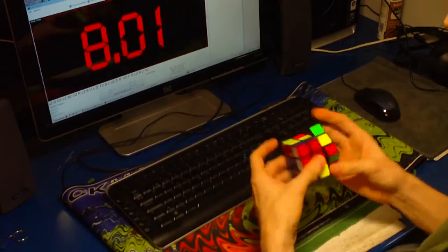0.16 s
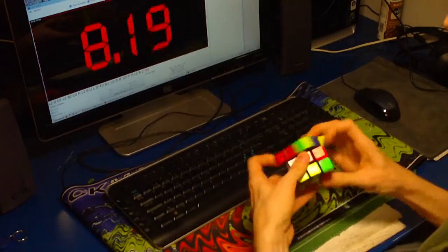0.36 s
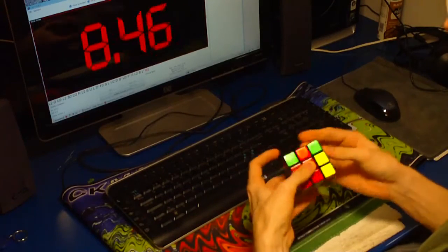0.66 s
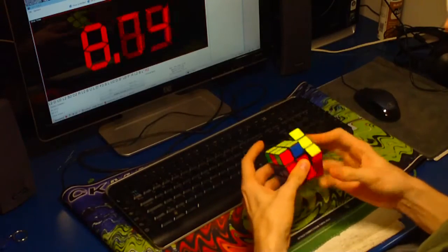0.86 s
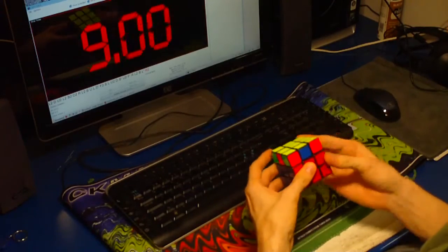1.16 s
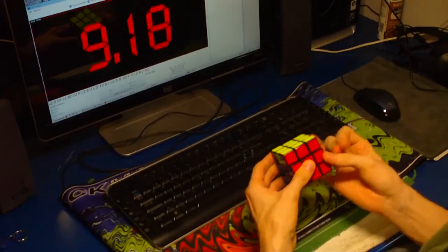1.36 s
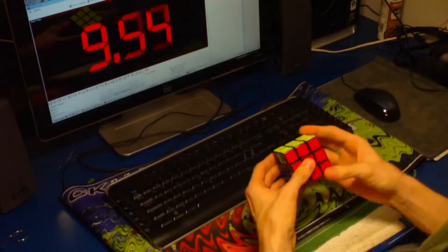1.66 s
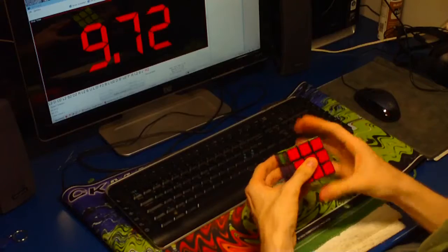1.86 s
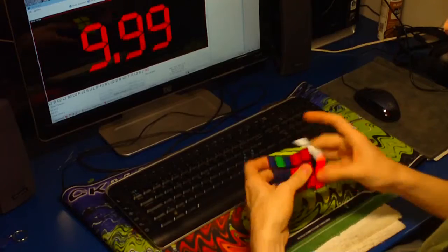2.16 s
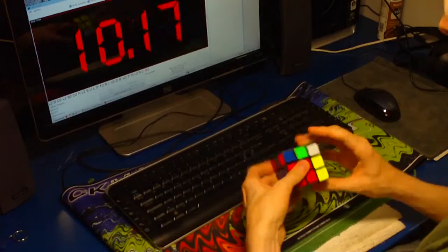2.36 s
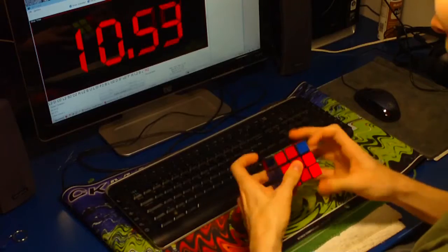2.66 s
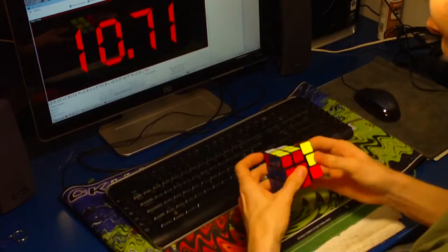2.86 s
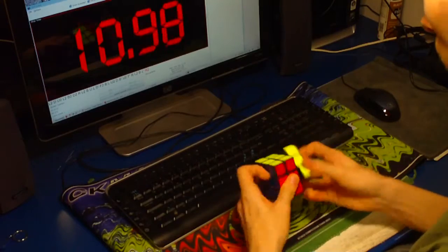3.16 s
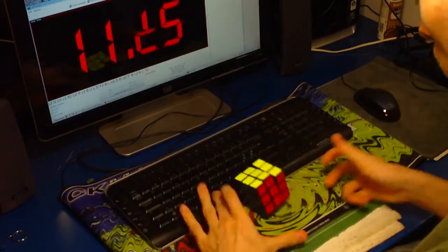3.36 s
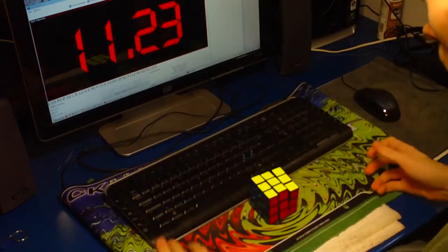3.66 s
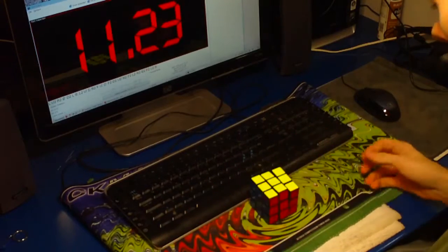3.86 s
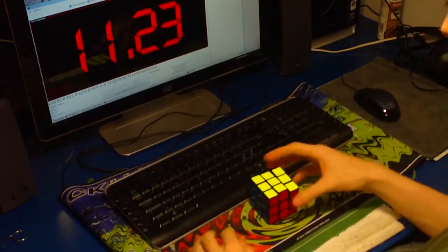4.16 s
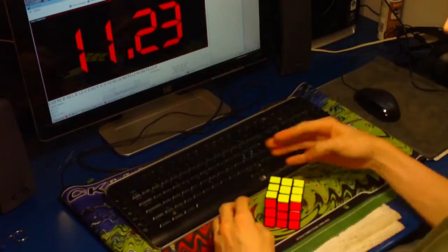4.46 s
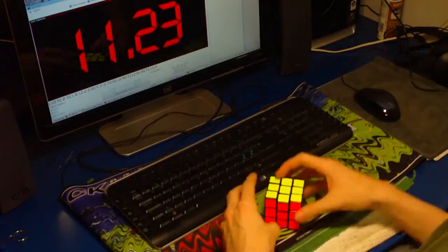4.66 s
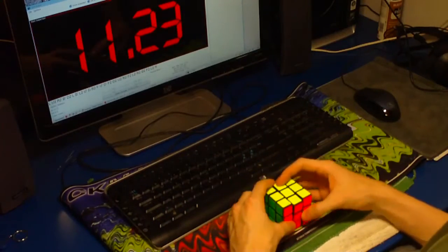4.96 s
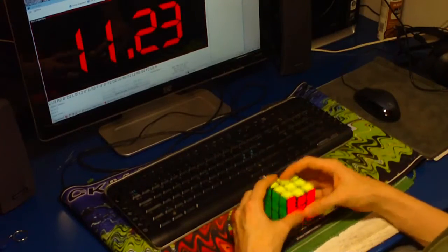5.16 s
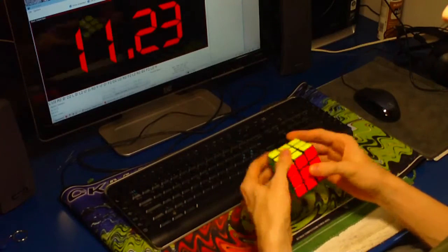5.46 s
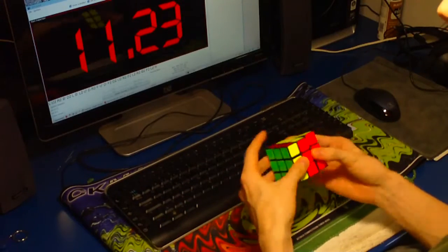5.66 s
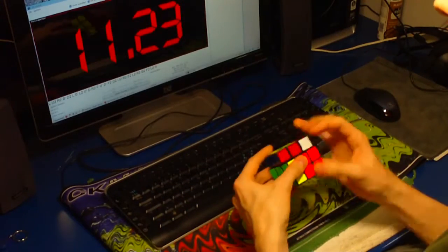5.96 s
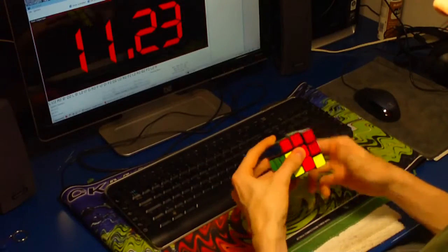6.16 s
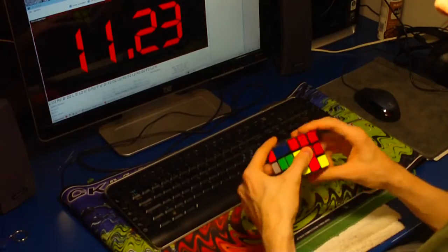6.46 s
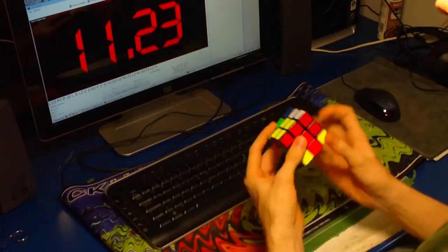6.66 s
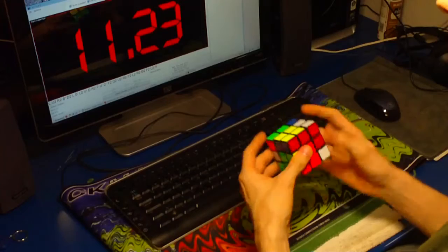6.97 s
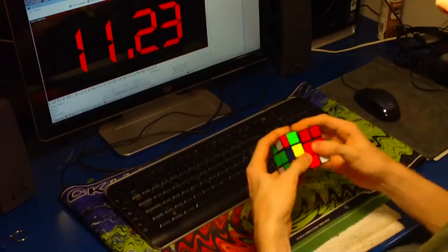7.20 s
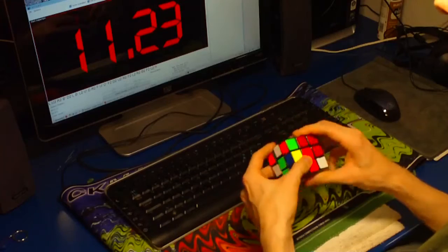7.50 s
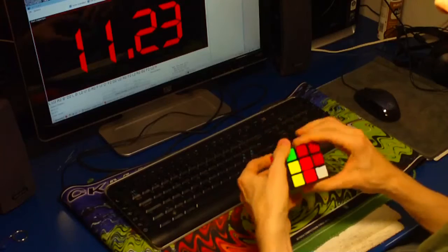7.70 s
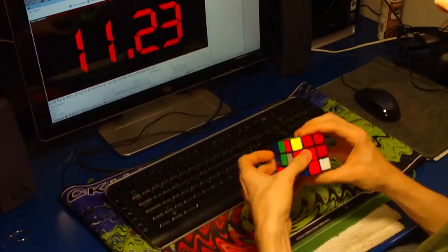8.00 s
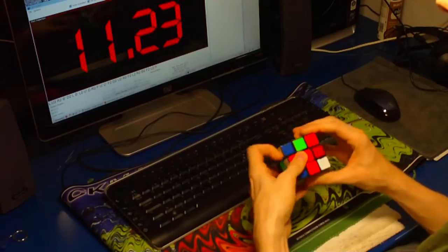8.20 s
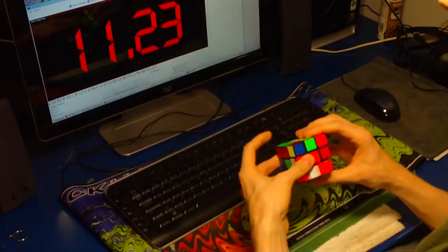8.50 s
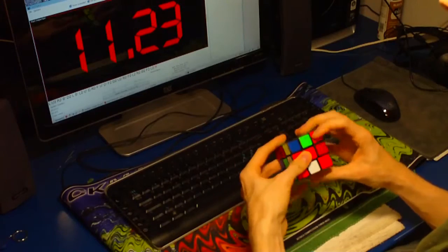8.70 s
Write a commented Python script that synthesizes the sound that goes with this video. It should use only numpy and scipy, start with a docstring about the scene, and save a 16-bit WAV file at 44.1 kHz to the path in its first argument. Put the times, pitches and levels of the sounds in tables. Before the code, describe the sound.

A small nearby microphone picks up fast clicking and clacking of loose plastic layers, with fingers tapping and sliding. A single violent smack on a padded desk interrupts it, leaving a short low boom and brief room echoes. After a sparse pause of light taps, gentler irregular twists return and gather pace. A steady, faint fan whir stays underneath throughout.

```python
"""A plastic puzzle cube is turned fast over a desk mat in a small room, slammed down, nudged, then scrambled.
Each turn is three bursts of tiny impacts (catch, clack, settle) ringing the resonances of hollow pieces.
Finger taps and random rattles ring the same body; rubbing layers and fingers are uneven noise through it.
The desk adds filtered-noise thuds and booms, the room adds changing echoes, and computer fans whir evenly.
A small microphone with two dips in its response, a soft overload and a narrowed range hears it all."""
import sys
import numpy as np
from scipy import signal
from scipy.fft import rfft, irfft
from scipy.io import wavfile
from scipy.ndimage import uniform_filter1d

SR = 44100
rng = np.random.default_rng(int(sys.argv[2]) if len(sys.argv) > 2 else 0)


def to_wav(sig):
    """Store sig (one row per channel, or 1-D mono) as 16-bit WAV at the path in sys.argv[1].

    Samples outside -1..1 are clipped; the rate is SR.
    """
    pcm = np.clip(np.atleast_2d(sig), -1, 1) * 32767
    pcm = np.round(pcm).astype(np.int16)
    wavfile.write(sys.argv[1], SR, pcm.T)  # frames by channels


N = 389844
TIME = np.arange(N) / SR  # s
SIZE = 8192  # samples in a colour filter
HZ = np.maximum(np.fft.rfftfreq(SIZE, 1 / SR), 1)
TEN_MS = np.sqrt(SR / 100)  # turns unit energy into rms 1 over 10 ms

# how busily layers and fingers slide, before the sources' own gains: start_s, level_db
RUB_LEVELS = [(0.0, -43), (0.32, -51), (1.13, -52), (1.45, -58), (2.07, -56), (2.31, -41.5), (2.71, -56),
              (3.25, -44), (3.94, -54), (4.28, -47.5), (5.37, -61), (6.45, -66), (6.62, -55), (7.44, -57),
              (7.68, -45), (8.39, -46.5), (8.72, -46.5), (8.84, -54)]


def from_db(db):
    """Decibels to an amplitude factor."""
    return 10 ** (np.asarray(db) / 20)


def unit_energy(x):
    """Scale a sound to total energy 1."""
    return x / np.sqrt(np.sum(x ** 2) + 1e-20)


def rms_one(x):
    """Scale a sound to rms 1."""
    return unit_energy(x) * np.sqrt(len(x))


def at_hz(points, hz):
    """Read a table on a log-frequency axis."""
    freqs, values = np.transpose(points)
    return np.interp(np.log(hz), np.log(freqs), values)


def bump(hz, width_hz):
    """Bell-shaped outline of one resonance, height 1."""
    return 1 / (1 + (2 * (HZ - hz) / width_hz) ** 2)


def response(curve_db):
    """Causal (minimum-phase) impulse response with the given colour."""
    cepstrum = irfft(np.log(from_db(curve_db)))
    # fold the cepstrum forward in time
    cepstrum[1:SIZE // 2] *= 2
    cepstrum[SIZE // 2 + 1:] = 0
    return irfft(np.exp(rfft(cepstrum)))


def through(x, impulse_response):
    """Filter a sound, keeping its length."""
    return signal.oaconvolve(x, impulse_response)[:len(x)]


def grains(count, spread_db):
    """Dense tiny impacts of very uneven size."""
    size_db = spread_db * np.clip(rng.standard_normal(count), -2, 2)
    return rng.standard_normal(count) * from_db(size_db)


def add(out, s, sound):
    """Lay a sound into the track at s seconds."""
    start = max(int(s * SR), 0)
    out[start:start + len(sound)] += sound[:max(N - start, 0)]


def fans():
    """Computer fans and hiss: steady coloured noise, an even whir under everything."""
    # broad colour of the whir: pitch_hz, density_db (per Hz)
    whir_colour = [(30, -14), (90, -11.5), (200, -4), (400, 2.5), (620, -3), (780, 2), (1050, -6.5),
                   (2100, -9), (4500, -11.5), (7500, -11.5), (10500, -9), (15000, -11.5)]
    level_db = -53.5
    whir = through(rng.standard_normal(N), response(at_hz(whir_colour, HZ)))
    return from_db(level_db) * rms_one(whir)


def echoes(late_db, late_t60, gap_s):
    """Dense echoes from desk, screen and walls with a faint longer tail, for one place of the cube."""
    # how long the room rings: pitch_hz, t60_s
    ring_times = [(150, 0.45), (500, 0.3), (1300, 0.18), (3500, 0.34), (8000, 0.1), (15000, 0.3)]
    age, tail = TIME[:SR // 2], 0
    edges = np.geomspace(60, 18000, 9)
    arrivals = grains(len(age), spread_db=5.0)
    onset = np.clip(age / gap_s - .5, 0, 1)  # the direct sound comes first
    late = from_db(late_db - 60 * age / late_t60)
    for low, high in zip(edges, edges[1:]):
        band_filter = signal.butter(2, [low, high], "band", fs=SR, output="sos")
        shifted = np.roll(arrivals, rng.integers(len(age)))
        band = signal.sosfilt(band_filter, shifted)
        fade = from_db(-60 * age / at_hz(ring_times, np.sqrt(low * high))) + late
        tail = tail + unit_energy(band * fade * onset) * np.sqrt(high - low)
    # the echoes favour no broad band
    spectrum = rfft(tail, SR)
    broad_power = uniform_filter1d(np.abs(spectrum) ** 2, size=300)
    return unit_energy(irfft(spectrum / np.sqrt(broad_power + 1e-9))[:len(age)])


def room(x, direct_db, echo_db, count):
    """The cube keeps moving in the hands, so the echo pattern changes from place to place."""
    out = from_db(direct_db) * x
    for part in np.array_split(np.arange(N), count):
        pattern = echoes(late_db=-33.0, late_t60=0.91, gap_s=0.001)
        add(out, TIME[part[0]], from_db(echo_db) * signal.fftconvolve(x[part], pattern))
    return out


def desk(thud_t60, boom_hz, boom_width_hz, boom_t60):
    """The mat gives a short noisy thud; a low resonance of the desk top booms a little longer."""
    # the cube meets the desk, levels ahead of the room: start_s, thud_db (over 10 ms), thud_hz, boom_db
    blows = [(3.279, -17.5, 310, -48), (3.317, -34, 375, -50), (4.336, -39, 416, -86),
             (4.446, -32.5, 426, -86)]
    # dull colour of a thud through the mat: multiple of thud_hz, density_db (per Hz)
    mat_colour = [(.1, -36), (.3, -22.5), (.6, -13), (1, 0), (1.6, -1.5), (3, -7.5), (9, -88)]
    out, age = np.zeros(N), TIME[:SR // 2]
    low_mode = response(20 * np.log10(bump(boom_hz, boom_width_hz)))
    for s, thud_db, thud_hz, boom_db in blows:
        push = rng.standard_normal(len(age)) * from_db(-60 * age / thud_t60)
        thud = TEN_MS * unit_energy(through(push, response(at_hz(mat_colour, HZ / thud_hz))))
        hum = rms_one(through(rng.standard_normal(len(age)), low_mode))
        boom = from_db(-60 * age / boom_t60) * hum
        add(out, s, from_db(thud_db) * thud + from_db(boom_db) * boom)
    return out


def cube_colour(tick_db, vary_db, detune):
    """Each contact excites the resonances in its own way; hard edges add a sharp tick."""
    # broad colour of a contact on the plastic: pitch_hz, density_db (per Hz)
    plastic = [(40, -29.5), (130, -33.5), (220, -21.5), (380, -14), (520, -5), (650, -3), (1650, -3.5),
               (2200, -5.5), (4700, -7.5), (6500, -7), (8500, -2), (10500, -10.5), (15000, -8.5)]
    # resonances of the hollow pieces, before each contact's variation: pitch_hz, width_hz, strength_db
    hollows = [(610, 180, 1.5), (1076, 200, 3.5), (1332, 185, 4.5), (1768, 197, 4.5), (3214, 310, 4),
               (5840, 180, 6.5), (6760, 640, 4), (8880, 90, 1)]
    colour = at_hz(plastic, HZ)
    for hz, width_hz, db in hollows:
        strength_db = db + vary_db * rng.standard_normal()
        colour = colour + strength_db * bump(hz * (1 + detune * rng.standard_normal()), width_hz)
    treble = at_hz([(1700, 0), (3800, 1)], HZ)  # full lift from 3800 Hz up
    return colour + tick_db * treble


def rubbing(gain_db, grit_db, tick_db, body_db):
    """Sliding plastic and fingers: a fine friction that catches and lets go, in the same hollow body."""
    catching_db = grit_db * rms_one(uniform_filter1d(rng.standard_normal(N), size=200))
    friction = grains(N, spread_db=2.5) * from_db(catching_db)
    colour = cube_colour(tick_db, 0, 0) + body_db * bump(hz=1100, width_hz=360)
    level_db = gain_db + np.interp(TIME, *np.transpose(RUB_LEVELS))
    return rms_one(through(friction, response(colour))) * from_db(level_db)


def contact(chatter_ms, first_touch, impacts_per_ms, scrape_db, swell):
    """A first touch, then separate rebounds over a fine scrape; a long chatter swells before it dies."""
    age_ms = 1000 * TIME[:SIZE // 2]
    rebounds = rng.random(len(age_ms)) < impacts_per_ms * age_ms[1]
    impacts = rms_one(rebounds * grains(len(age_ms), spread_db=2.0))
    scrape = from_db(scrape_db) * rms_one(grains(len(age_ms), spread_db=5.0))
    rise = 1 - np.exp(-age_ms / (swell * chatter_ms))
    decay = np.exp(-age_ms / (2 * chatter_ms))
    force = unit_energy((impacts + scrape) * rise * decay)
    force[0] += first_touch / np.sqrt(chatter_ms)
    # the blow's energy is shared evenly over broad bands, so the plastic sets the colour
    spectrum = rfft(force, SIZE)
    broad_power = uniform_filter1d(np.abs(spectrum) ** 2, size=130)
    return irfft(spectrum / np.sqrt(broad_power))[:len(age_ms)]


def click(db, knock_hz, knock_db, tick_db, chatter_ms):
    """One contact rings the cube; the grip sets the pitch of its knock, and force brightens it."""
    plain_db, tick_db_per_db = -25, 0.24  # a contact harder than plain is brighter, a softer one duller
    knock_width = 0.54  # share of the knock's pitch
    force = contact(max(chatter_ms, .5), first_touch=0.38, impacts_per_ms=1.4, scrape_db=-1.5, swell=0.1)
    colour = cube_colour(tick_db + tick_db_per_db * (db - plain_db), vary_db=1.0, detune=0.016)
    colour = colour + knock_db * bump(knock_hz, knock_width * knock_hz)
    return from_db(db) * TEN_MS * unit_energy(signal.fftconvolve(force, response(colour)))


def rattles(tick_db, pitch_spread, count):
    """Loose pieces tick at random, louder the more the hands work the cube."""
    per_s, over_rub_db, spread_db = 20, 0.6, 2.6
    middle_hz, knock_db, chatter_ms = 1080, 3.5, 2.2
    out, s = np.zeros(N), 0
    waits = rng.exponential(1, count)
    sizes, pitches = np.clip(rng.standard_normal((2, count)), -2, 2)
    for wait, size, pitch in zip(waits, sizes, pitches):
        s += wait / per_s
        if s < TIME[-1]:
            db = np.interp(s, *np.transpose(RUB_LEVELS)) + over_rub_db + spread_db * size
            knock_hz = middle_hz * np.exp(pitch_spread * pitch)
            add(out, s, click(db, knock_hz, knock_db, tick_db, chatter_ms))
    return out


def taps(gain_db, knock_db):
    """A finger landing on the cube gives a single hollow knock, dull from the pad and sharp from the nail."""
    # fingers tap, nudge or regrip, levels before gain_db:
    # start_s, level_db (over 10 ms), knock_hz, tick_db, chatter_ms
    landings = [(0.199, -36.5, 478, -5, 7.2), (0.221, -31, 560, -12, 4.5), (0.689, -41, 546, -1, 3.3),
                (0.939, -40.5, 1200, 5, 3), (0.987, -40, 1400, -1, 5), (1.089, -41, 1030, -0.5, 9),
                (1.255, -33.5, 1440, 6, 4.6), (1.774, -47.5, 940, -7, 3), (2.052, -41, 523, -4, 3.8),
                (2.089, -36, 400, -2, 5.8), (2.476, -34, 547, -2, 4.4), (2.547, -29, 1800, 6, 18),
                (2.768, -32.5, 556, -9, 0.8), (2.91, -30, 760, -1, 5.2), (3.075, -26, 570, 3, 8.6),
                (3.143, -31.5, 560, 1, 3.9), (3.238, -50, 450, -10, 2.9), (3.61, -34, 1140, 3.5, 4),
                (3.624, -30.5, 1240, -0.5, 7.3), (3.772, -42.5, 1070, -6, 8.4), (4.013, -42, 1230, -3, 14),
                (4.155, -42.5, 1150, 1, 5.5), (4.235, -39, 1270, 7, 8.5), (4.332, -32.5, 1000, -8.5, 4.4),
                (4.446, -31, 970, -16, 0.89), (4.479, -36, 1040, -0.5, 5), (4.703, -34, 1130, -4.5, 4.9),
                (4.725, -32.5, 1150, -3, 21), (5.046, -41.5, 1120, -1, 6), (5.067, -36, 1210, -2, 8.7),
                (5.187, -47, 1200, 9, 1.5), (5.38, -44, 393, -6, 17), (5.828, -33.5, 470, -3, 7.7),
                (6.385, -44, 1100, 2, 5.7), (6.667, -35, 1050, -3, 5.9), (6.783, -34, 1910, 1, 6.9),
                (6.828, -36, 1830, 7, 14), (6.989, -37.5, 388, 4.5, 3.5), (7.041, -35.5, 1330, 1, 20),
                (7.575, -34, 1050, 1, 6.9), (7.595, -27, 1330, -2, 6), (8.048, -29, 1300, 0.5, 7.6),
                (8.088, -32.5, 1270, 0, 13), (8.126, -28, 1450, -2.5, 20), (8.173, -31, 400, 1, 3.4),
                (8.35, -39, 400, -3, 8), (8.618, -37.5, 1240, -1, 3), (8.812, -28.5, 1150, 4, 4.8)]
    out = np.zeros(N)
    for s, db, knock_hz, tick_db, chatter_ms in landings:
        add(out, s, click(db, knock_hz, knock_db, tick_db, chatter_ms))
    return from_db(gain_db) * out


def slam():
    """All the pieces crash together as the cube lands, rocks and comes to rest."""
    # graze, edge, face, rocking back, last rattle: after_ms, level_db (against slam_db), knock_db, tick_db
    steps = [(0, -20, 21, -4), (2.965, -2, 2.5, -6), (9.9, -.5, -3, 4), (41, -20.5, 10, -13),
             (138, -22, 14, 19)]
    slam_s, slam_db, knock_hz, chatter_ms = 3.2752, -4.5, 1420, 2.1
    out = np.zeros(N)
    for after_ms, db, knock_db, tick_db in steps:
        s = slam_s + after_ms / 1000
        add(out, s, click(slam_db + db, knock_hz, knock_db, tick_db, chatter_ms))
    return out


def turns(gain_db):
    """Every turn has three beats: the corners catch, the layer clacks home, the pieces settle."""
    # each turned layer, clack level before gain_db, catch and settle levels against the clack:
    # clack_s, level_db (over 10 ms), knock_hz, knock_db, tick_db, chatter_ms,
    # catch_ms (before), catch_db, settle_ms (after), settle_db
    layers = [(0.018, -31, 463, 12.5, 0, 2.3, 17.5, 3, 26.3, 1.5),
              (0.2516, -14, 1490, 10.5, 5, 2.5, 10.9, -8.5, 8.7, 2.5),
              (0.3094, -12.5, 1150, 14.5, 4.5, 4.1, 1.44, -16, 12.2, -2),
              (0.5395, -24, 620, 17, -1, 1.6, 13, -6.5, 12, -20),
              (0.739, -31.5, 580, 8, 2, 16, 25.5, -7, 35, -0.5),
              (0.806, -19.5, 700, 7, 0.5, 1.8, 17, -10.5, 10, -16),
              (1.223, -30, 418, 7, 0, 5.8, 19.4, -2.5, 44.5, 0),
              (2.1425, -20.5, 686, 8, 2.5, 9, 22.7, -9.5, 36.4, 0.5),
              (2.266, -27, 690, 8.5, 1, 4.7, 8, -21, 10.4, -5),
              (2.401, -28, 490, 8, -2, 7, 6, -4.5, 42, -7.5),
              (2.574, -27.5, 600, 12, -1.5, 4.7, 32, -12, 47, -7),
              (2.7976, -23, 716, 8, 0.5, 2.1, 14, -10, 12.8, -5),
              (2.931, -23.5, 630, 7, -0.5, 0.65, 37, -13.5, 8.6, -23),
              (3.057, -22.5, 600, 5.5, -1.5, 2.8, 9, -6.5, 36, -1),
              (5.462, -35.5, 455, 13, -0.5, 6.9, 3.6, -5, 42.4, 1.5),
              (5.767, -28, 564, 8, 4, 10.5, 7.9, -4.5, 54, -8.5),
              (6.025, -34.5, 560, 12, -2, 17, 24, -10.5, 48, 1),
              (6.089, -31.5, 530, 2, 2.5, 2.5, 19, -12, 31, -1),
              (6.424, -25.5, 540, 6, 0.5, 11, 16, -14, 92, -14.5),
              (6.702, -27.5, 1350, 7.5, -1, 3.7, 16.3, -3, 45, -0.5),
              (7.113, -39, 540, 2, -0.5, 2, 16, -3.5, 21, 0.5),
              (7.465, -24, 620, 6, -2, 9.9, 11.5, -10, 24.5, -7.5),
              (7.734, -21.5, 620, 8, -5, 11.4, 5.8, -7.5, 10, -12),
              (7.7763, -21, 607, 5.5, -5, 3.1, 8, -11, 23, 2),
              (8.479, -22.5, 684, 6, -2, 3.5, 16.8, -8.5, 62, -12.5),
              (8.757, -21.5, 590, 1, -0.5, 4.1, 16.7, -10, 17.3, -0.5)]
    catch_pitch = 0.92  # share of the clack's pitch
    catch_chatter_ms, catch_tick_db = 6, -0.5
    settle_chatter_ms, settle_tick_db = 2.95, 0.5
    out = np.zeros(N)
    for s, db, knock_hz, knock_db, tick_db, chatter_ms, catch_ms, catch_db, settle_ms, settle_db in layers:
        catch = click(db + catch_db, catch_pitch * knock_hz, knock_db, tick_db + catch_tick_db, catch_chatter_ms)
        clack = click(db, knock_hz, knock_db, tick_db, chatter_ms)
        settle = click(db + settle_db, knock_hz, knock_db, tick_db + settle_tick_db, settle_chatter_ms)
        add(out, s - catch_ms / 1000, catch)
        add(out, s, clack)
        add(out, s + settle_ms / 1000, settle)
    return from_db(gain_db) * out


def scene():
    """Cube and desk sound in the room, over the fans."""
    cube = turns(gain_db=0.22) + taps(gain_db=0.47, knock_db=10.0) + slam()
    cube = cube + rattles(tick_db=0.5, pitch_spread=0.38, count=200)
    cube = cube + rubbing(gain_db=-1.1, grit_db=6.5, tick_db=-6.5, body_db=2.0)
    knocks = desk(thud_t60=0.06, boom_hz=126, boom_width_hz=38, boom_t60=0.47)
    return (room(cube + knocks, direct_db=-2.5, echo_db=-1.5, count=110) + fans())[None]


def record(dry):
    """The small microphone has two dips, overloads on the hardest blow and cuts the deep bass and the top."""
    # dips in the microphone's response: pitch_hz, width_hz, depth_db
    dips = [(3930, 270, -5.5), (12090, 1530, -26.5)]
    overload, bass_cut_hz, top_cut_hz = 1, 30, 15500  # overload is the highest amplitude it can pass
    colour = sum(db * bump(hz, width_hz) for hz, width_hz, db in dips)
    coloured = through(dry[0], response(colour))
    limited = coloured / (1 + (coloured / overload) ** 12) ** (1 / 12)
    bass_cut = signal.butter(1, bass_cut_hz, "high", fs=SR, output="sos")
    top_cut = signal.ellip(10, .2, 80, top_cut_hz, fs=SR, output="sos")
    thinned = signal.sosfilt(bass_cut, limited)
    return signal.sosfilt(top_cut, thinned)[None]


dry = scene()
out = record(dry)
to_wav(out)
```